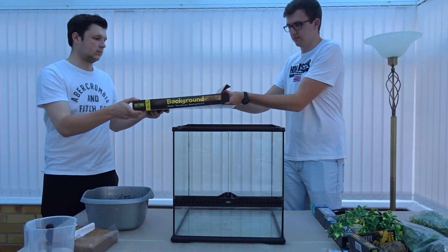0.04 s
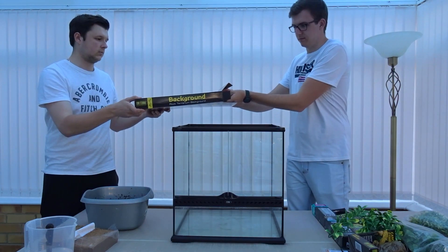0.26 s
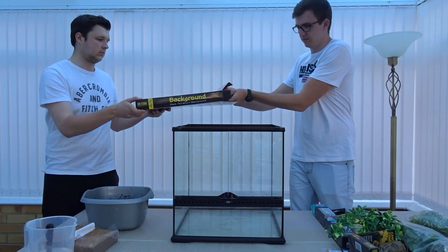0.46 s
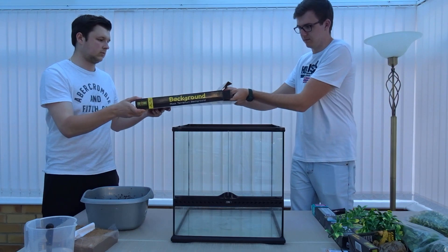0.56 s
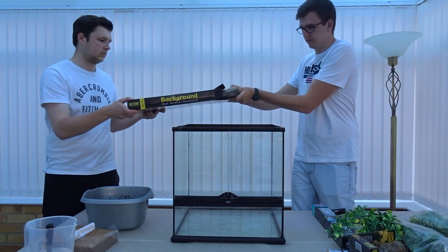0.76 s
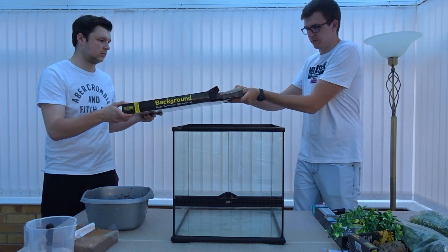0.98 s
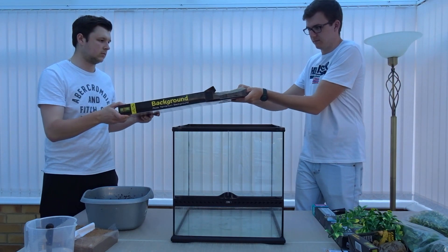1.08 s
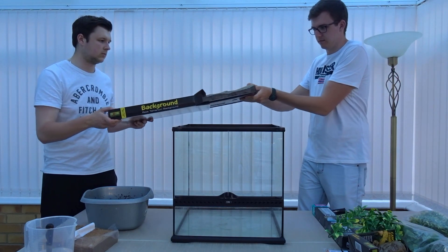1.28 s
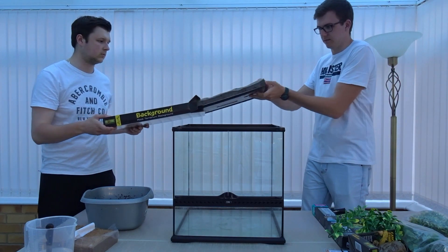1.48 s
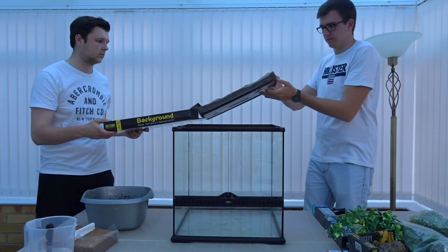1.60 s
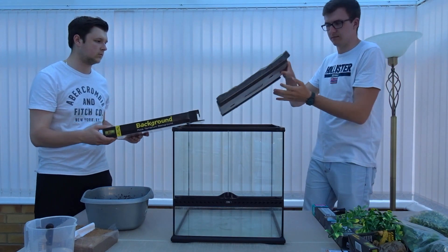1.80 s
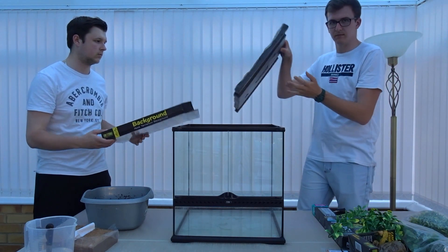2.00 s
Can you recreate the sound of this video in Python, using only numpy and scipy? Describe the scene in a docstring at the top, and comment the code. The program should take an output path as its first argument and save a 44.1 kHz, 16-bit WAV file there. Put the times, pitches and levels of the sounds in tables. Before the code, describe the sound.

Long dry rasping scrape of foam against cardboard, then a hollow knock and soft hand rustles

```python
"""Foam panel pulled from a cardboard box

A foam panel is pulled out of a long cardboard box in a small, hard-walled room.
Countless tiny slips, drawn as random clicks and filtered, make the card rasp and hiss.
The panel's end catches as it leaves; the empty box knocks and booms through decaying modes.
Hands rustle before and after, as filtered slips; a fingertip taps the panel with a noise burst.
"""
import sys
import numpy as np
from scipy import signal
from scipy.fft import rfft, irfft
from scipy.io import wavfile
from scipy.ndimage import uniform_filter1d

SR = 44100
rng = np.random.default_rng(int(sys.argv[2]) if len(sys.argv) > 2 else 0)


def log_audio(samples):
    """Write samples as a 16-bit WAV file to the path given in sys.argv[1]."""
    # one column per channel
    frames = np.atleast_2d(samples).T
    # limit to full scale, then quantise
    limited = np.clip(frames, -1, 1)
    pcm = np.round(limited * 32767).astype(np.int16)
    wavfile.write(sys.argv[1], SR, pcm)


N = 90404
TIME_S = np.arange(N) / SR

# Spectra are relative: colour() scales each filter to unit energy.
# Room tone spectrum: freq_hz, level_db (per Hz)
FLOOR_SPECTRUM = [(30, -9), (100, -3), (200, -21), (400, 11), (900, 24.5), (3000, 19.5), (11000, 2)]
FLOOR_DB = -61

# Room decay: freq_hz, t60_s
ROOM_DECAY = [(100, 0.3), (350, 0.38), (1000, 0.36), (2500, 0.45), (5000, 0.36), (11000, 0.31)]
# Likeness of the room sound at the two microphones: freq_hz, correlation (-1..1)
MIC_LIKENESS = [(100, 0.99), (350, 0.87), (700, 0.67), (1400, 0.63), (2600, 0.67), (4000, 0.055),
                (6500, -0.61), (11000, -0.08)]
ROOM_DB, ECHO_DB, ECHO_REACH_S = -0.5, -9, .016
BODY_ROOM_DB = -6  # the box's low sounds are drier than the scrape

# Microphones and band limits
LEFT_LAG_S, LEFT_DB = .000024, -0.47
LOW_CUT_HZ, EDGE_HZ = 160, 11040

# Modes of the hollow box: freq_hz, level_db, t60_s
BOX_MODES = [(297, -13, 0.093), (405, -2, 0.14), (617, 4.5, 0.13), (750, -20, 0.075), (1130, -19, 0.079)]
BOX_TOP_HZ = 1480
BOX_RUB_DB, BOX_CATCH_DB = -13, -31.5  # ring relative to its drive

# Level of the box's hollow rub: time_s, level_db
HOLLOW_LEVELS = [(.15, -73), (.22, -66), (.35, -64.5), (.41, -60), (.47, -64), (.54, -60.5), (.62, -61.5),
                 (.68, -56), (.728, -74), (.76, -53), (.81, -62), (.86, -56), (.9, -63), (.93, -100),
                 (1.06, -85), (1.1, -64), (1.14, -78), (1.18, -66), (1.3, -61), (1.39, -72), (1.44, -53.5),
                 (1.5, -60), (1.55, -57.5), (1.62, -55.5), (1.7, -52), (1.73, -79)]
# Hollow rub spectrum: freq_hz, level_db (per Hz)
HOLLOW_SPECTRUM = [(60, -34), (140, -16), (220, -12.5), (290, -9), (410, 3.5), (560, 11.5), (800, 1),
                   (2000, -31.5)]

# Groans of the box's wall under the foam: start_s, length_s, level_db, pitch_hz
WALL_GROANS = [(0.642, 0.038, -66, 300), (0.754, 0.032, -61, 270), (0.83, 0.033, -63, 265),
               (0.879, 0.041, -52.5, 439), (1.076, 0.036, -62, 368), (1.32, 0.05, -55.5, 289),
               (1.325, 0.065, -52.5, 511), (1.472, .04, -57, 467), (1.686, 0.045, -41.5, 405)]
GROAN_WAVER = .02  # rms share of the pitch

# Boom of the air in the box as the panel pops out: freq_hz, level_db, t60_s
AIR_MODES = [(136, -51.5, 0.18), (177, -51.5, 0.21)]
POP_S, POP_RISE_S = 1.711, 0.0059

# Hands shifting their grip: start_s, length_s, rub_level_db, squeak_level_db
HAND_RUSTLES = [(-.05, .12, -46, -55), (0.04, .035, -57, -67), (1.911, 0.068, -55.5, -73),
                (1.978, 0.12, -51.5, -54.5), (2.016, 0.014, -66, -58)]
# Hand rub spectrum: freq_hz, level_db (per Hz)
RUSTLE_SPECTRUM = [(100, -43), (400, -36), (800, -17), (1500, -6), (3200, -5.5), (5500, -5), (8000, -10),
                   (11000, -15.5)]
SQUEAK_HZ, SQUEAK_WIDTH_HZ = 3160, 2000

# Fingertip tap on the panel, spectrum: freq_hz, level_db (per Hz)
TAP_SPECTRUM = [(100, -43), (400, 1.5), (900, -8), (1500, -1), (2800, -1), (5000, -7), (8000, -22),
                (11000, -18)]
TAP_S, TAP_DB = 1.923, -25

# Knocks on the box: start_s, crack_level_db, ring_level_db
BOX_KNOCKS = [(1.707, -3.5, -43.5), (1.718, -11, -54), (1.839, -22, -80), (1.961, -45, -60)]
# Knock crack spectrum: freq_hz, level_db (per Hz)
KNOCK_SPECTRUM = [(50, -82), (120, -23), (230, -12), (370, 6), (700, 4), (1350, 13.5), (2200, 4.5),
                  (4500, -2), (11000, -15)]
KNOCK_T60_S, KNOCK_RISE_S = 0.072, 0.0035

# Panel's end catching on the box's lip: start_s, length_s, level_db
LIP_CATCHES = [(1.641, 0.055, -26.5), (1.675, .015, -23.5), (1.684, 0.036, -32.5)]
# Catch spectrum: freq_hz, level_db (per Hz)
CATCH_SPECTRUM = [(100, -94), (250, -61), (400, -21), (800, -2.5), (2000, -6.5), (3400, -3.5), (5000, 7.5),
                  (6000, 4), (7300, 8.5), (8300, 3.5), (11000, 1.5)]

# Foam snagging and letting go with a tick: start_s, level_db
FOAM_SNAGS = [(.592, -9), (.982, -8), (1.221, -6), (1.229, -9), (1.396, -4), (1.524, -6.5), (1.572, -4.5)]
# Snag spectrum: freq_hz, level_db (per Hz)
SNAG_SPECTRUM = [(200, -58), (700, -11), (2000, 1), (3500, 6.5), (5000, -3), (11000, -6.5)]
SNAG_T60_S, SNAG_RISE_S = 0.014, 0.0021

# Foam binding while the card sings: start_s, length_s, level_db, start_pitch_hz, end_pitch_hz
FOAM_BINDS = [(0.414, 0.055, -39, 2900, 3300), (0.493, 0.071, -38.5, 3500, 3340),
              (0.631, 0.07, -33, 3170, 2970), (0.809, 0.13, -39, 2650, 2430),
              (1.154, 0.082, -30.5, 2700, 2500), (1.173, 0.076, -32.5, 3700, 3450),
              (1.247, 0.033, -32.5, 4570, 4870), (1.25, 0.088, -32.5, 2700, 3000),
              (1.344, 0.087, -34.5, 3070, 2860), (1.472, .11, -37.5, 3020, 3420),
              (1.654, .022, -29.5, 3520, 3480)]
BIND_WIDTH_HZ = 1220

# The long pull: time_s, rasp_level_db, hiss_level_db
PULL_LEVELS = [(.132, -70, -78), (.158, -48.5, -69), (.185, -39.5, -56), (.235, -32.5, -46),
               (.28, -37.5, -43.5), (.35, -36, -43), (.43, -34.5, -35.5), (.52, -32, -33),
               (.6, -32.5, -29.5), (.68, -31.5, -26), (.75, -33, -26.5), (.81, -31.5, -26.5),
               (.88, -34, -29.5), (.97, -33, -30.5), (1.05, -34, -29), (1.14, -32.5, -29.5),
               (1.2, -39, -29), (1.29, -34, -28), (1.37, -33.5, -28.5), (1.45, -35, -31), (1.49, -34, -28),
               (1.56, -39, -31.5), (1.63, -38.5, -33), (1.7, -39, -40), (1.73, -79, -70)]
# Card rasp spectrum: freq_hz, level_db (per Hz)
RASP_SPECTRUM = [(60, -77), (200, -72), (400, -50), (590, -29.5), (700, -7), (1200, -3.5), (2000, 2.5),
                 (3200, 2.5), (4500, -2.5), (7000, -5), (11000, -16.5)]
# Foam hiss spectrum: freq_hz, level_db (per Hz)
HISS_SPECTRUM = [(100, -68), (600, -89), (2000, -27), (4000, -3.5), (5500, -3), (8000, -4.5), (11000, -6.5)]

SLIPS_PER_S, SLIP_SPREAD_DB, JUDDER_HZ = 9000, 2, 67.6
JUDDER_DB, HISS_JUDDER_DB = 1.92, 0.92  # the card judders more than the foam's fine hiss


def amp(db):
    """Decibels to gain."""
    return 10 ** (np.asarray(db) / 20)


def unit(x):
    """Scales to rms 1."""
    return x / np.sqrt(np.mean(x ** 2) + 1e-20)


def decay(t_s, t60_s):
    """Exponential decay, down 60 dB at t60."""
    return np.exp(-np.log(1000) * t_s / t60_s)


def read(points, hz):
    """Interpolates a table along log frequency."""
    table_hz, value = np.transpose(points)
    return np.interp(np.log(hz + 1), np.log(table_hz + 1), value)


def level(time_s, db):
    """Gain curve through timed dB points, near silent outside them."""
    return amp(np.interp(TIME_S, time_s, db, left=-120, right=-120))


def colour(x, spectrum, size=4096):
    """Minimum-phase filter of unit energy with the given spectrum."""
    hz = abs(np.fft.fftfreq(size, 1 / SR))
    log_gain = np.log(amp(read(spectrum, hz)))
    response = np.exp(np.conj(signal.hilbert(log_gain)))
    taps = np.fft.ifft(response).real[:size // 2]
    return signal.fftconvolve(x, taps / np.linalg.norm(taps))[:N]


def resonate(x, hz, width_hz):
    """Resonance that may glide: shift to 0 Hz, smooth by a double pole, shift back; rms 1."""
    turn = np.exp(2j * np.pi * np.cumsum(hz * np.ones(N)) / SR)
    r = np.exp(-np.pi * width_hz / SR)
    shifted = np.diff(x, prepend=0) / turn
    smooth = signal.lfilter([1], [1, -2 * r, r * r], shifted)
    return unit((turn * smooth).real)


def stroke(start_s, length_s, db, edge):
    """Envelope of a short rub: rise, hold, release; edge is the share taken by each slope."""
    u = (TIME_S - start_s) / length_s
    slope = np.clip(np.minimum(u, 1 - u) / edge, 0, 1)
    return amp(db) * np.sin(np.pi / 2 * slope) ** 2


def slips(judder_db=JUDDER_DB):
    """Friction: dense tiny clicks of uneven size, clumped by the judder of the foam."""
    low_pass = 1 + (np.fft.rfftfreq(N, 1 / SR) / JUDDER_HZ) ** 2
    judder = unit(irfft(rfft(rng.standard_normal(N)) / low_pass, N))
    size_db = SLIP_SPREAD_DB * np.minimum(rng.exponential(1, N), 4)
    size = amp(size_db) * rng.choice([-1, 1], N)
    hit = rng.random(N) < SLIPS_PER_S / SR
    return unit(size * hit * amp(judder_db * judder))


def clatter(start_s, db, rise_s, t60_s):
    """A brief noise burst of contacts, quick to rise and to die."""
    t = np.maximum(TIME_S - start_s, 0)
    burst = np.minimum(t / rise_s, 1) * decay(t, t60_s) * rng.standard_normal(N)
    return amp(db) * burst / np.linalg.norm(burst)


def pair(a, b):
    """Two unrelated signals become a diffuse field at two close microphones."""
    same = np.clip(read(MIC_LIKENESS, np.fft.rfftfreq(len(a), 1 / SR)), -1, 1)
    mid = rfft(a) * np.sqrt((1 + same) / 2)
    side = rfft(b) * np.sqrt((1 - same) / 2)
    return irfft(np.array([mid + side, mid - side]), len(a))


def room_tone():
    """Steady diffuse noise of the room, faint."""
    a, b = [colour(rng.standard_normal(N), FLOOR_SPECTRUM) for _ in range(2)]
    return amp(FLOOR_DB) * pair(a, b)


def reflections(count=10, size=256):
    """One room response: a few early echoes and a noise tail whose decay depends on frequency."""
    t = TIME_S[:SR // 2]
    noise = rng.standard_normal(len(t)) * np.minimum(t / 0.011, 1)
    hz, frame_s, bands = signal.stft(noise, SR, nperseg=size)
    bands = bands * decay(frame_s, read(ROOM_DECAY, hz)[:, None])
    tail = signal.istft(bands, SR, nperseg=size)[1][:len(t)]
    tail *= amp(ROOM_DB) / np.linalg.norm(tail)
    at = (rng.uniform(.002, ECHO_REACH_S, count) * SR).astype(int)
    tail[at] += amp(ECHO_DB) * rng.choice([-1, 1], count) / np.sqrt(count)
    return tail


def varied_room(x, count=36):
    """Many room responses crossfade in turn, for a rub spread over many points of the box."""
    out = np.zeros((2, N + SR))
    for k in range(count):
        away = TIME_S / TIME_S[-1] * (count - 1) - k
        near = np.flatnonzero(abs(away) < 1)
        part = (x * np.cos(np.pi / 2 * away))[None, near]
        wet = signal.fftconvolve(part, pair(reflections(), reflections()), axes=1)
        out[:, near[0]:near[0] + wet.shape[1]] += wet
    return out[:, :N]


def box(x):
    """The hollow box rings in its decaying modes, softened by a low-pass."""
    t = TIME_S[:SR // 2]
    ring = sum(amp(db) * decay(t, t60_s) * np.cos(2 * np.pi * hz * t) for hz, db, t60_s in BOX_MODES)
    rung = signal.fftconvolve(x, ring)[:N]
    return signal.lfilter(*signal.butter(1, BOX_TOP_HZ, fs=SR), rung)


def hollow_rub():
    """Low hollow rub of the box, its level following a timed curve, with ringing modes."""
    rub = colour(slips() * level(*np.transpose(HOLLOW_LEVELS)), HOLLOW_SPECTRUM)
    return rub + amp(BOX_RUB_DB) * rub.std() * unit(box(rub))


def groans():
    """Slow stick-slip on the box's wall: short, wavering low tones."""
    out = np.zeros(N)
    for start_s, length_s, db, hz in WALL_GROANS:
        waver = unit(uniform_filter1d(rng.standard_normal(N), size=300))
        phase = 2 * np.pi * np.cumsum(hz * (1 + GROAN_WAVER * waver)) / SR
        out += np.sin(phase) * stroke(start_s, length_s, db, edge=0.5)
    return out


def pop():
    """The air column of the emptied box swells and dies away."""
    t = np.maximum(TIME_S - POP_S, 0)
    boom = sum(amp(db) * decay(t, t60_s) * np.sin(2 * np.pi * hz * t) for hz, db, t60_s in AIR_MODES)
    return np.minimum(t / POP_RISE_S, 1) * boom


def rustles():
    """Soft rubs of hands on card and foam, with a grainy squeak where the fingers grip."""
    rub = sum(stroke(start_s, length_s, db, edge=0.41) for start_s, length_s, db, _ in HAND_RUSTLES)
    grip = sum(stroke(start_s, length_s, db, edge=0.33) for start_s, length_s, _, db in HAND_RUSTLES)
    squeak = grip * resonate(slips(), SQUEAK_HZ, SQUEAK_WIDTH_HZ)
    return colour(slips() * rub, RUSTLE_SPECTRUM) + squeak


def tap():
    """A light fingertip tap on the freed panel: one short, coloured burst."""
    return colour(clatter(TAP_S, TAP_DB, rise_s=.004, t60_s=0.037), TAP_SPECTRUM)


def knocks():
    """Each knock is a clatter of card and a push on the box's modes."""
    crack, push = np.zeros(N), np.zeros(N)
    for start_s, crack_db, ring_db in BOX_KNOCKS:
        crack += clatter(start_s, crack_db, KNOCK_RISE_S, KNOCK_T60_S)
        push[round(start_s * SR)] += amp(ring_db)
    return colour(crack, KNOCK_SPECTRUM) + box(push)


def catches():
    """Bright bursts of friction on the lip, which also set the box ringing."""
    drive = slips(HISS_JUDDER_DB) * sum(stroke(*row, edge=0.36) for row in LIP_CATCHES)
    ring = amp(BOX_CATCH_DB) * drive.std() * unit(box(drive))
    return colour(drive, CATCH_SPECTRUM) + ring


def snags():
    """Short ticks, as bursts of contacts, that stand out of the scrape."""
    ticks = sum(clatter(start_s, db, SNAG_RISE_S, SNAG_T60_S) for start_s, db in FOAM_SNAGS)
    return colour(ticks, SNAG_SPECTRUM)


def binds():
    """Where the foam binds, its slips drive a broad, gliding resonance."""
    out = np.zeros(N)
    for start_s, length_s, db, from_hz, to_hz in FOAM_BINDS:
        hz = np.interp(TIME_S, [start_s, start_s + length_s], [from_hz, to_hz])
        song = resonate(slips(), hz, BIND_WIDTH_HZ)
        out += song * stroke(start_s, length_s, db, edge=0.17)
    return out


def scrape():
    """The long pull: slips drive the card's rasp and the foam's hiss."""
    time_s, rasp_db, hiss_db = np.transpose(PULL_LEVELS)
    rasp = slips() * level(time_s, rasp_db)
    hiss = slips(HISS_JUDDER_DB) * level(time_s, hiss_db)
    return colour(rasp, RASP_SPECTRUM) + colour(hiss, HISS_SPECTRUM)


def scene():
    """All handling sounds, direct and through the room, over a faint room tone."""
    body = hollow_rub() + groans() + pop()
    surface = rustles() + tap() + knocks() + catches() + snags() + binds() + scrape()
    right = surface + body
    lag = np.exp(-2j * np.pi * np.fft.rfftfreq(N, 1 / SR) * LEFT_LAG_S)
    left = irfft(rfft(right) * lag, N)
    wet = varied_room(surface + amp(BODY_ROOM_DB) * body)
    share = 1 / np.sqrt(1 + amp(ROOM_DB) ** 2 + amp(ECHO_DB) ** 2)  # offsets the room's added energy
    return share * (np.array([left, right]) + wet) + room_tone()


def record(dry):
    """The microphone's low cut, a slight channel imbalance and a steep band limit."""
    low_cut = signal.butter(2, LOW_CUT_HZ, "high", fs=SR, output="sos")
    thin = signal.sosfilt(low_cut, dry)
    taps = signal.firwin(1023, EDGE_HZ, window=("kaiser", 9), fs=SR)
    balance = np.array([[amp(LEFT_DB)], [1]])
    return signal.oaconvolve(thin * balance, taps[None], "same")


dry = scene()
out = record(dry)
log_audio(out)
```